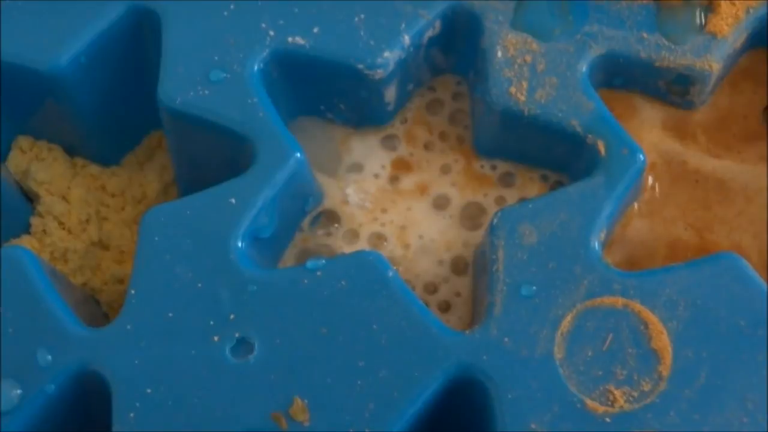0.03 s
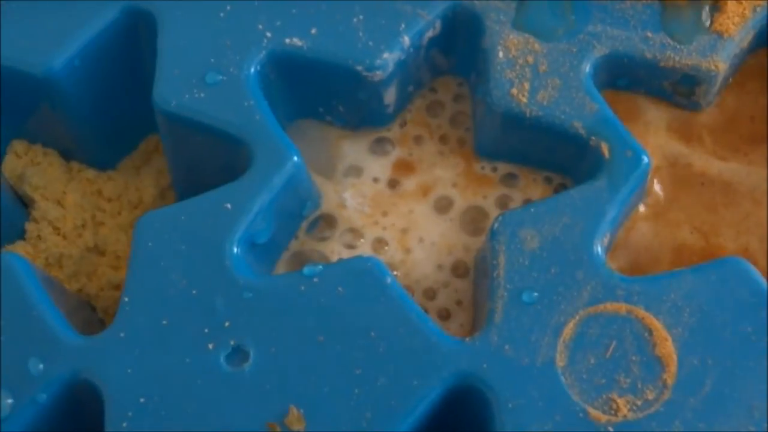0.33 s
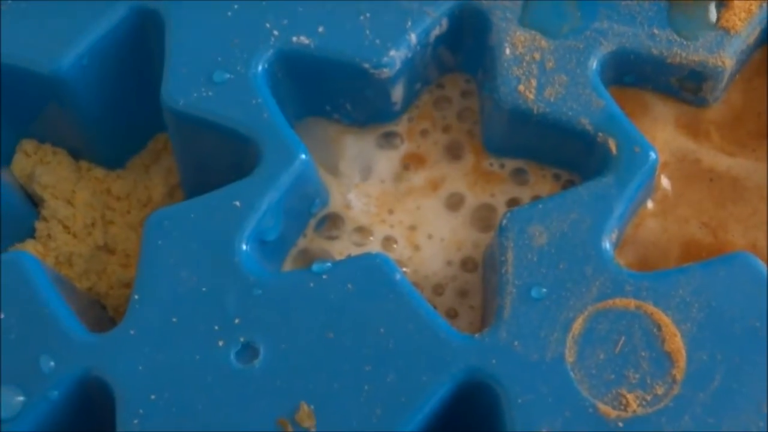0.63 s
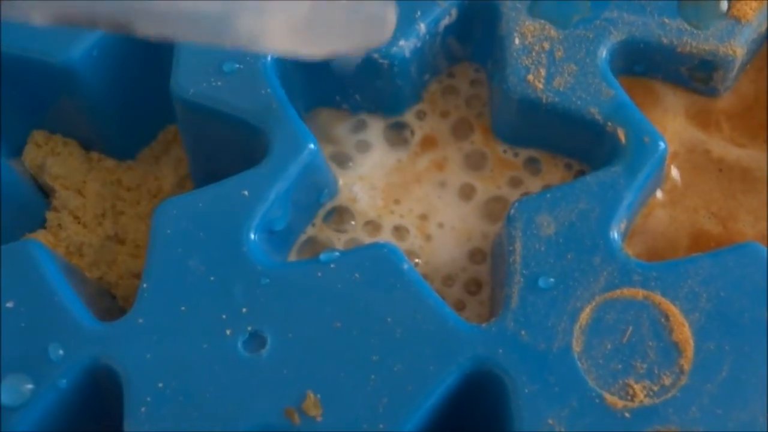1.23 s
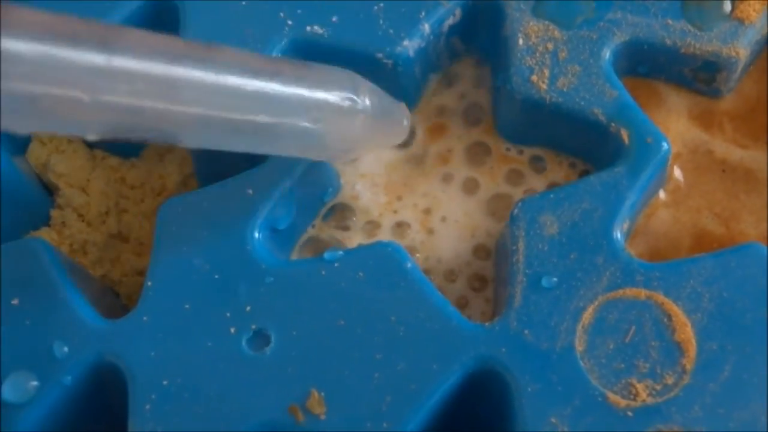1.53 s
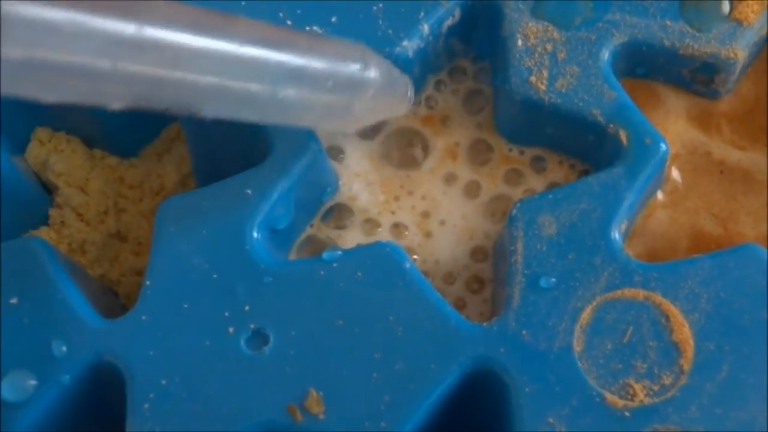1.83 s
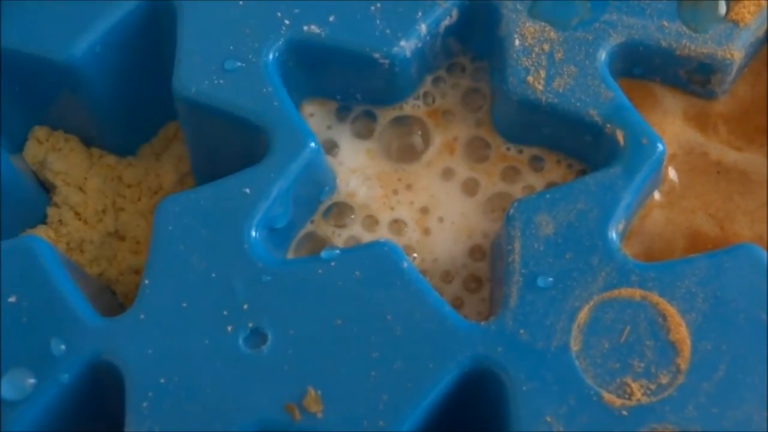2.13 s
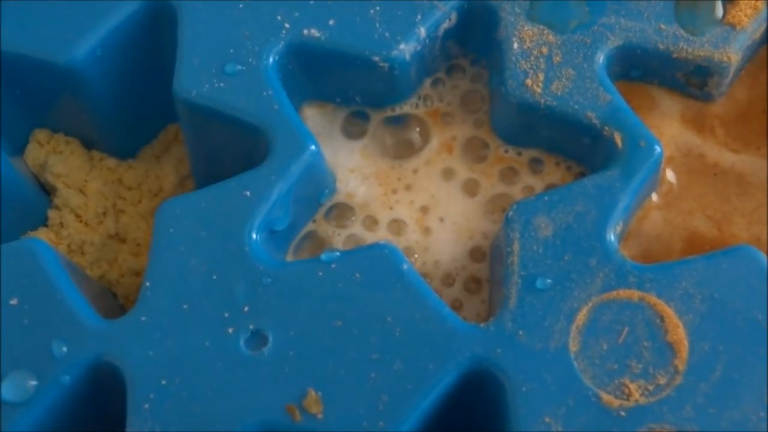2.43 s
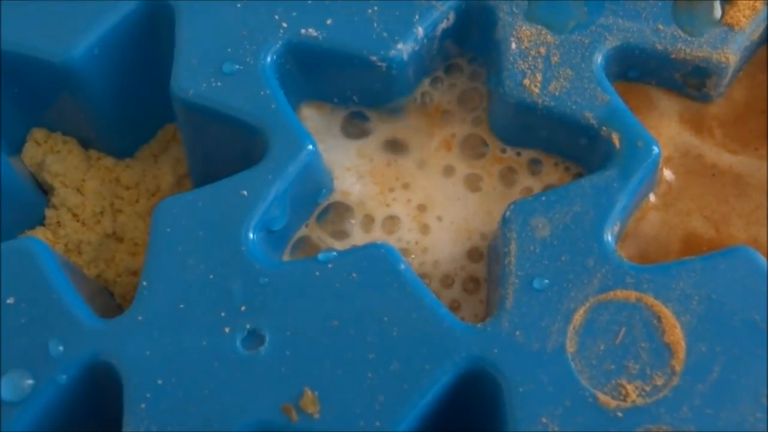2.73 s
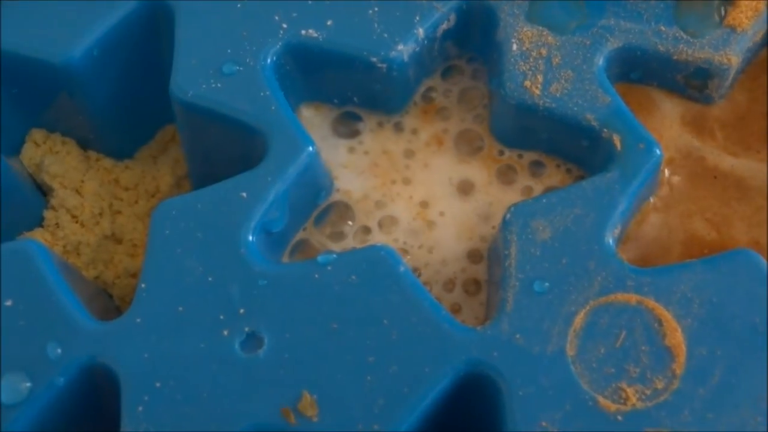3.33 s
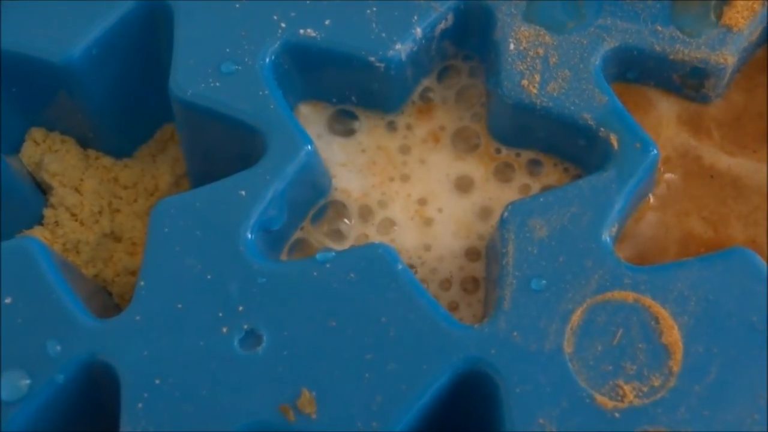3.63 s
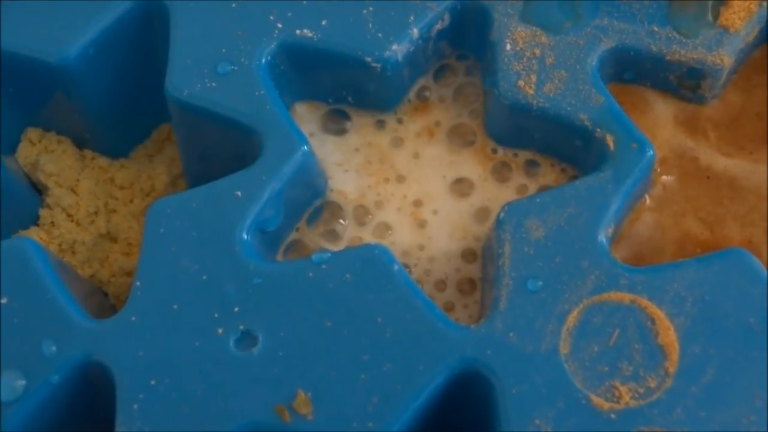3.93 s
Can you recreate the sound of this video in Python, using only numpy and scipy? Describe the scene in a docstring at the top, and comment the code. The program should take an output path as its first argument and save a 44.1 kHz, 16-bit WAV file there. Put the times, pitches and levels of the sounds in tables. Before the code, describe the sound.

Foam fizzes softly in a plastic tray well, close to the microphone, with small pops. A few handling ticks come first, then a dropper clicks, and later glass is set down with a ringing clink. The room rumbles faintly.

```python
"""In a small room with a low rumble, foam fizzes softly in a well of a plastic tray, close to the microphone.
The fizz is many tiny bubbles bursting, with a few larger pops; an echo in the well makes it hollow.
A few handling ticks sound right by the microphone, a plastic dropper clicks, things knock on the table,
and a glass-like object is set down with a ringing clink.
Early on the whole background level drops abruptly, room tone too; then the fizz builds."""
import sys
import numpy as np
from scipy import signal
from scipy.fft import rfft, irfft, next_fast_len
from scipy.io import wavfile
from scipy.ndimage import uniform_filter1d, map_coordinates

SR = 44100
rng = np.random.default_rng(int(sys.argv[2]) if len(sys.argv) > 2 else 0)


def wav_out(sig):
    """Save sig, one row per channel (or a flat mono array), as 16-bit PCM at SR to the path in sys.argv[1]."""
    wavfile.write(sys.argv[1], SR, np.round(np.clip(np.atleast_2d(sig).T, -1, 1) * 32767).astype(np.int16))


N = 176400
TIME = np.arange(N) / SR  # seconds through the whole scene
T = np.arange(SR) / SR  # seconds through one short sound
BURSTS_PER_S, FIZZ_SIDE_DB = 1100, -43


def amp(db):
    """Turn decibels into a number to multiply by."""
    return 10 ** (np.asarray(db) / 20)


def unit(x):
    """Scale a sound to an average strength (rms) of 1."""
    return x / np.sqrt(np.mean(x ** 2) + 1e-20)


def along(points, hz):
    """Read between (frequency, value) points, with octaves evenly spaced."""
    f, v = np.transpose(points)
    return np.interp(np.log(hz + 1e-3), np.log(f), v)


def curves(rows):
    """Join rows of (time, values) with straight lines, one curve per value column."""
    times, *columns = np.transpose(rows)
    return [np.interp(TIME, times, column) for column in columns]


def coloured(x, gain_db):
    """Turn each frequency up or down by gain_db(f), with no ringing ahead of the sound."""
    n = x.shape[-1]
    m = 2 * next_fast_len(n)
    cepstrum = irfft(np.log(amp(gain_db(np.fft.rfftfreq(m, 1 / SR))) + 1e-6))
    cepstrum[1:m // 2] *= 2  # fold the part before time zero onto the part after it
    cepstrum[m // 2 + 1:] = 0
    return irfft(rfft(x, m) * np.exp(rfft(cepstrum)), m)[..., :n]


def add(out, s, x, pan_db=0):
    """Mix a short sound in at s seconds; pan_db is left minus right."""
    start = round(s * SR)
    out[:, start:start + SR] += (x * amp([[pan_db / 2], [-pan_db / 2]]))[:, :N - start]


def widen(pair, side_db=0):
    """Make stereo from a middle, which both ears share, and a side, which sets them apart."""
    mid, side = pair[0], amp(side_db) * pair[1]
    return np.array([mid + side, mid - side])


def bed(pair, colour, side_db):
    """Shape two noises into a stereo texture; colour gives the level at each frequency."""
    return unit(widen(coloured(pair, lambda f: along(colour, f)), side_db))


def noise():
    """Two unrelated white noises."""
    return rng.standard_normal((2, N))


def ring(modes):
    """A struck body rings in fading tones (f/Hz, level/dB, t60/s); t60 is the time to fade by 60 dB."""
    return sum(amp(db - 60 * T / t60) * np.sin(2 * np.pi * hz * T) for hz, db, t60 in modes)


def blow(gain_db, t60, grit):
    """A sharp hit: one spike, then fading noise whose strength is grit."""
    hit = grit * rng.standard_normal(SR) * amp(-60 * T / t60)
    hit[0] = 1
    hit = coloured(hit, gain_db)
    return hit / np.sqrt(np.sum(hit ** 2) / (SR * (t60 / 40 + .0003)))


def in_room(x, wet_db):
    """A sound plus the room's fading echo, whose level is wet_db."""
    fade_times = [(100, 0.56), (400, 0.33), (1200, 0.38), (3500, 0.38), (12000, 0.11)]  # how long the room rings: f/Hz, t60/s
    hz, t, spectrum = signal.stft(rng.standard_normal((2, SR // 2)), SR, nperseg=256)
    fade = amp(-60 * t / along(fade_times, hz)[:, None])
    tail = signal.istft(spectrum * fade, SR, nperseg=256)[1]
    build_up = 1 - np.exp(-T[:tail.shape[1]] / 0.02)
    tail = widen(tail * build_up, side_db=-9)
    tail /= np.linalg.norm(tail[0])
    tail = coloured(tail, lambda f: along([(1100, -0.5), (3200, -5), (9000, -19)], f))
    return x + amp(wet_db) * signal.fftconvolve(np.atleast_2d(x), tail, axes=1)[:, :SR]


def room_tone():
    """The room's low rumble, nearly the same in both ears, under a wide, airy rush."""
    levels = [(0, -43.5, -48), (.71, -43, -46.5), (.725, -49, -53.5), (1.4, -47, -53.5), (2.9, -43, -50),
              (3.3, -47, -51.5), (4, -46, -51)]  # room loudness: t/s, rumble level/dB, air level/dB
    rumble_colour = [(20, -8.5), (70, -9), (105, -3), (165, -2), (300, -6), (440, -17.5), (800, -46)]  # tone of the rumble: f/Hz, level/dB
    air_colour = [(200, -7.5), (450, 3), (800, -2), (1300, -4.5), (2100, -10), (4000, -47.5)]  # tone of the air: f/Hz, level/dB
    rumble_db, air_db = curves(levels)
    mid, side = coloured(noise(), lambda f: along(rumble_colour, f))
    side = coloured(side, lambda f: along([(40, -30), (280, -9)], f))
    rumble = amp(rumble_db + 0.5) * unit(widen([mid, side]))
    return rumble + amp(air_db + 3) * bed(noise(), air_colour, side_db=4.5)


def knocks():
    """Dull blows make the table ring briefly, and the room answers."""
    hits = [(1.511, -26, .03, 130, 300, -17), (1.567, -31, 0.026, 130, 340, -7),
            (1.7019, -20.5, 0.017, 109, 1100, -15), (3.01, -11, 0.057, 294, 5000, -8.5),
            (3.6218, -19.5, 0.087, 89, 1110, -7)]  # knocks: t/s, level/dB, t60/s, low cut/Hz, high cut/Hz, echo level/dB
    table_colour = [(60, 0), (330, 0.5), (520, -6.5), (780, -6.5), (1000, -10), (1170, -7), (1450, -12),
                    (3000, -16.5), (9000, -31)]  # tone of the table: f/Hz, level/dB
    table_modes = [(330.5, -16.5, 0.46)]  # its ring for a knock with a t60 of 0.097 s: f/Hz, level/dB, t60/s
    out = np.zeros((2, N))
    for s, db, t60, low_hz, high_hz, wet_db in hits:
        cut_db = lambda f: 10 * np.log10((1 + (low_hz / (f + 1)) ** 8) * (1 + (f / high_hz) ** 4))
        thud = blow(lambda f: along(table_colour, f) - cut_db(f), t60, grit=0.11)
        tone = ring([(hz, level, t60 * life / 0.097) for hz, level, life in table_modes])
        add(out, s, in_room(amp(db) * (thud + tone), wet_db))
    return out


def ticks():
    """Handling ticks so near that each ear gets its own tail; brighter ones ring the case more."""
    taps = [(0.2715, -13, 1090, -11.5, 1.5), (.4103, -14.5, 2020, -34, -0.5), (0.7463, -4, 2360, -46, -0.5),
            (1.1458, -4, 1690, -16, -4)]  # ticks: t/s, level/dB, pitch/Hz, thump level/dB, left minus right/dB
    shape = [(.1, -29), (.48, -15.5), (.63, 0), (.85, 2), (1.25, -2), (1.9, -4.5), (2.7, -20), (8, -44)]  # tone of a tick: multiple of its pitch, level/dB
    width = [(200, 11), (750, 7.5), (1500, -1.5), (3500, -0.5)]  # stereo width: f/Hz, side over middle/dB
    case_modes = [(2780, -36, 0.16)]  # ring of the case: f/Hz, level/dB, t60/s
    side_lag_s = 0.0003
    out = np.zeros((2, N))
    for s, db, hz, thump_db, pan_db in taps:
        mid, side = [blow(lambda f: along(shape, f / hz), t60=0.017, grit=0.094) for _ in range(2)]
        side = np.roll(coloured(side, lambda f: along(width, f)), round(side_lag_s * SR))
        snap = amp(db - 8.5) * widen([mid, side])
        case = amp(db) * ring([(f, level + along(shape, f / hz), t60) for f, level, t60 in case_modes])
        thump = ring([(270, thump_db, 0.0057)])
        add(out, s, snap + case + thump, pan_db)
    return out


def dropper():
    """The plastic dropper snaps with a hollow ring and a fast falling chirp, then scratches."""
    snap_colour = [(170, -25), (450, -11), (1150, -1), (1450, -5), (2200, -5.5), (3100, 4), (4300, -9),
                   (6800, -10), (8800, -24.5), (12200, -11.5), (15800, -26)]  # tone of the snap: f/Hz, level/dB
    plastic_modes = [(622, -35, 0.25), (736, -29.5, .08), (938, -31, 0.16), (1200, -28, .05),
                     (1794, -18, 0.043)]  # ring of the plastic: f/Hz, level/dB, t60/s
    scratch_colour = [(2000, -19), (7000, -2), (12000, 2), (15500, -5)]  # f/Hz, level/dB
    from_hz, to_hz, fall_s, length_s = 1230, 332, 0.00798, 0.012
    chirp_hz = to_hz + (from_hz - to_hz) * np.exp(-(T / fall_s) ** 2)
    chirp = np.sin(2 * np.pi * np.cumsum(chirp_hz) / SR) * np.exp(-(T / length_s) ** 6)
    snaps = [blow(lambda f: along(snap_colour, f), t60=0.049, grit=0.85) for _ in range(2)]
    click = amp(-7) * widen(snaps, side_db=-18) + amp(-13) * chirp + ring(plastic_modes)
    out = np.zeros((2, N))
    add(out, 1.4372, in_room(click, wet_db=-19))
    add(out, 1.448, amp(-17.5) * blow(lambda f: along(scratch_colour, f), t60=0.015, grit=0.8))
    return out


def clink():
    """Two hard contacts about a millisecond apart set the glass ringing."""
    contacts = [(3.0098, -14), (3.0106, -1)]  # the glass touches down: t/s, level/dB
    colour = [(1000, -17), (2000, -23), (3500, -1), (7500, 8.5), (10000, 0.5), (15500, -39)]  # tone of a contact: f/Hz, level/dB
    glass_modes = [(1037, -42, 0.9), (1969, -30.5, 0.9), (3351, -16.5, 0.41), (3360, -22, 0.15),
                   (5116, -16, 0.079), (5101, -33, 0.46), (7195, -20.5, 0.06), (7208, -33.5, 0.32),
                   (9500, -27.5, 0.15), (12300, -34, .06), (15000, -43, .11)]  # ring of the glass: f/Hz, level/dB, t60/s
    out = np.zeros((2, N))
    for s, db in contacts:
        hit = amp(db - 7.5) * blow(lambda f: along(colour, f), t60=0.017, grit=0.11)
        add(out, s, in_room(hit, wet_db=-2), pan_db=-6)
    add(out, contacts[0][0], in_room(ring(glass_modes), wet_db=-5), pan_db=-3)
    return out


def in_well(x, delay_s=0.00139, strength=0.32):
    """A short, slightly dull, upside-down echo between the well's walls makes the fizz hollow."""
    dulled = uniform_filter1d(x, size=3, axis=1)
    return x - strength * np.roll(dulled, round(delay_s * SR), axis=1)


def bursts(per_s, spread_db=6):
    """Tiny bubble skins break at random moments: two rows of spikes, big and small."""
    size = amp(spread_db * np.minimum(rng.standard_normal((2, N)), 2.5))
    breaks = rng.random((2, N)) < per_s / SR
    return breaks * size * rng.choice([-1, 1], (2, N))


def fresh_bubbles(peak_s=1.7, width_s=0.31):
    """Fresh, fine bubbles crackle in a few narrow bands, swelling after the dropper clicks."""
    colour = [(4300, -16), (5400, -1.5), (6200, -3), (7600, -4), (8350, 0.5), (8800, -6), (9300, -5),
              (10200, -22)]  # tone of the fine bubbles: f/Hz, level/dB
    swell = np.exp(-((TIME - peak_s) / width_s) ** 2)
    return amp(-47.5) * swell * bed(bursts(BURSTS_PER_S), colour, FIZZ_SIDE_DB)


def collapse(peak_s=1.04, width_s=0.086):
    """A patch of foam collapses in a short run of coarser crackles."""
    colour = [(2200, -20), (3000, 0), (5000, -2), (11000, -14)]  # f/Hz, level/dB
    swell = np.exp(-((TIME - peak_s) / width_s) ** 2)
    return amp(-47.5) * swell * unit(coloured(bursts(per_s=370)[0], lambda f: along(colour, f)))


def pops(ring_cycles=24):
    """Each larger bubble snaps as it bursts and rings for a moment."""
    bubbles = [(0.2338, -18, 5600), (0.3163, -19.5, 3360), (.574, -25, 3100), (0.695, -26.5, 1450),
               (0.886, -25.5, 3360), (1.8334, -19.5, 7440), (2.334, -23.5, 6020), (2.5031, -20.5, 6630),
               (3.2537, -24, 10100)]  # larger bubbles: t/s, level/dB, pitch/Hz
    shape = [(.3, -17), (.7, -10.5), (1, 5), (1.6, -6.5), (3, -20)]  # tone of a pop: multiple of its pitch, level/dB
    out = np.zeros((2, N))
    for s, db, hz in bubbles:
        snap = amp(db - 5.5) * blow(lambda f: along(shape, f / hz), t60=0.0066, grit=0.068)
        add(out, s, snap + ring([(hz, db - 9, ring_cycles / hz)]))
    return out


def foam():
    """Fine and coarse bubbles crackle in flurries over the hiss of countless smaller ones."""
    levels = [(0, -46, -49.5), (.71, -44.5, -51.5), (.725, -51, -56.5), (1.2, -49.5, -57),
              (1.9, -46, -55.5), (2.96, -43, -50), (3.03, -45, -49.5), (3.45, -45, -49), (4, -48, -55.5)]  # fizz loudness: t/s, fine level/dB, coarse level/dB
    fine_colour = [(2200, -18.5), (3200, -3), (3800, -4.5), (4250, -5.5), (5200, 1.5), (6000, -0.5),
                   (8000, -3), (12300, -1), (15700, -6)]  # tone of the fine fizz: f/Hz, level/dB
    coarse_colour = [(600, -9.5), (1400, -2.5), (2100, -9), (3250, -2), (4250, -5), (7000, -29)]  # tone of the coarse fizz: f/Hz, level/dB
    fine_db, coarse_db = curves(levels)
    # the crackle glides between 25 random levels a second
    flurries = amp(2 * map_coordinates(rng.standard_normal(200), [TIME * 25], mode="wrap"))
    fine = amp(-3) * flurries * bed(bursts(BURSTS_PER_S), fine_colour, FIZZ_SIDE_DB)
    fine += amp(-1.5) * bed(noise(), fine_colour, FIZZ_SIDE_DB)
    coarse = amp(-1.5) * flurries * bed(bursts(BURSTS_PER_S / 2), coarse_colour, side_db=-2)
    coarse += amp(-0.5) * bed(noise(), coarse_colour, side_db=-2)
    return amp(fine_db) * fine + amp(coarse_db) * coarse


def scene():
    """The fizz in its well, plus everything on and around the table."""
    fizz = in_well(foam() + fresh_bubbles() + collapse() + pops())
    return fizz + room_tone() + ticks() + dropper() + knocks() + clink()


def record(dry, top_hz=15780):
    """Clip the peaks at full scale, then remove everything above top_hz."""
    m = next_fast_len(N + SR // 2)
    spectrum = rfft(np.clip(dry, -1, 1), m)
    return irfft(spectrum * (np.fft.rfftfreq(m, 1 / SR) < top_hz), m)[:, :N]


dry = scene()
out = record(dry)
wav_out(out)
```